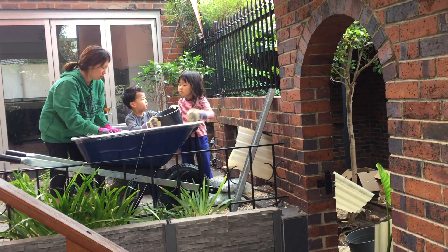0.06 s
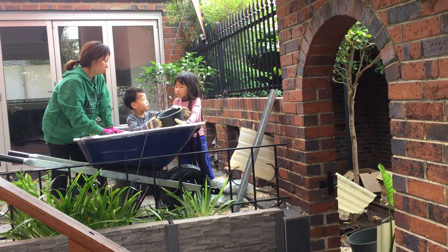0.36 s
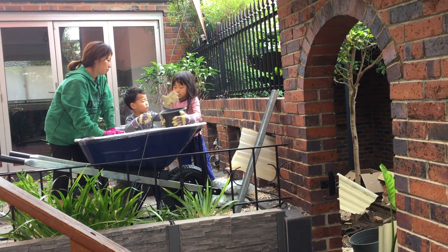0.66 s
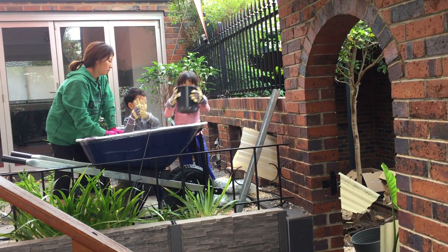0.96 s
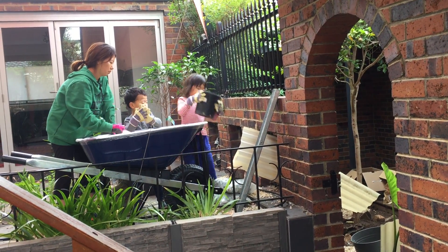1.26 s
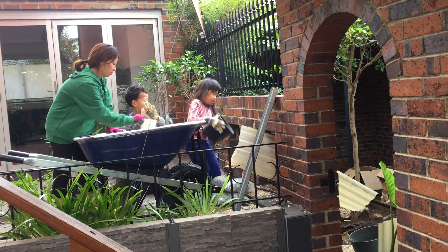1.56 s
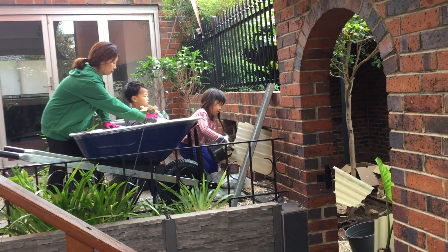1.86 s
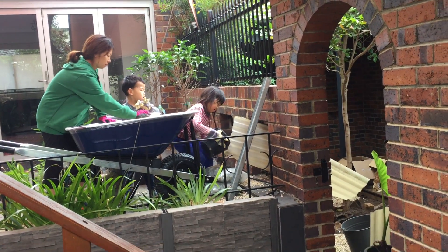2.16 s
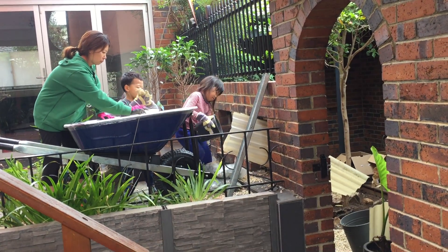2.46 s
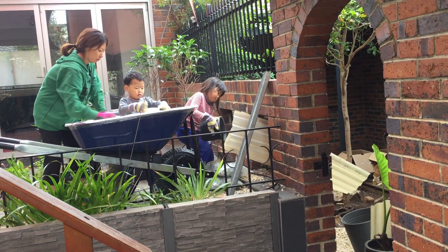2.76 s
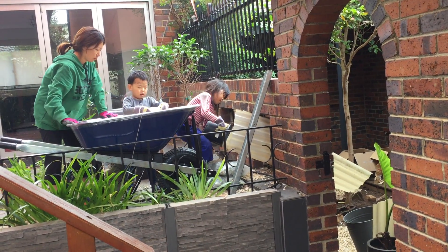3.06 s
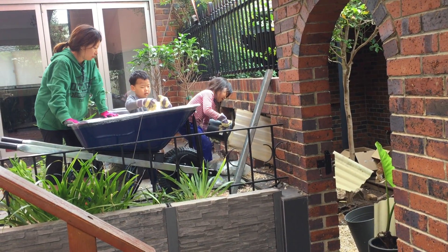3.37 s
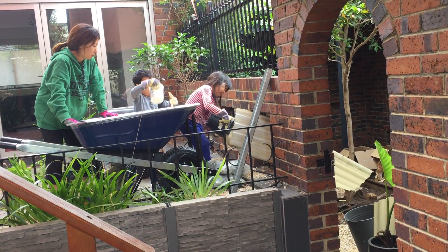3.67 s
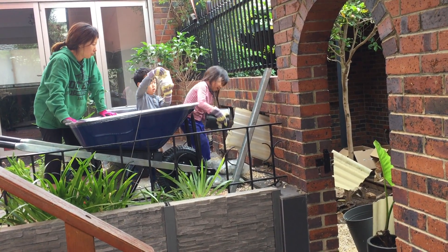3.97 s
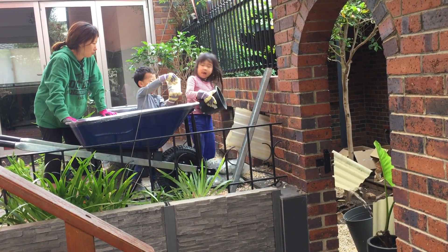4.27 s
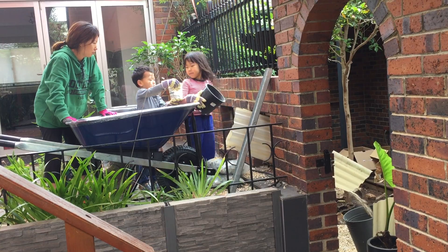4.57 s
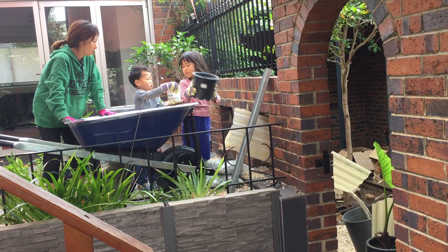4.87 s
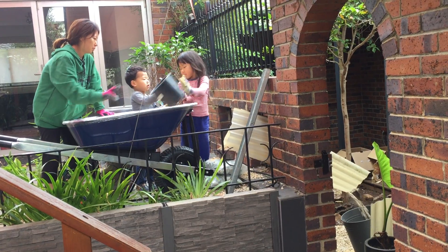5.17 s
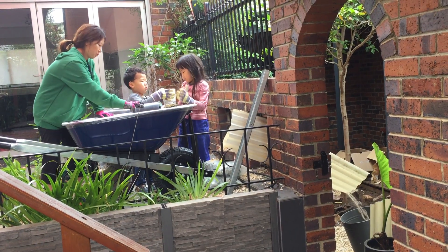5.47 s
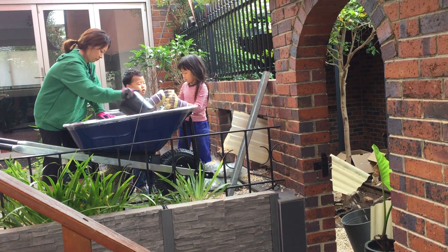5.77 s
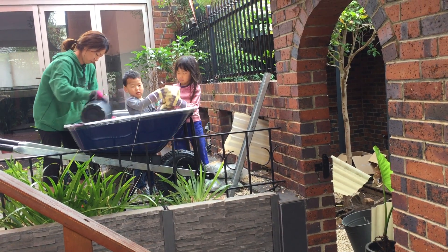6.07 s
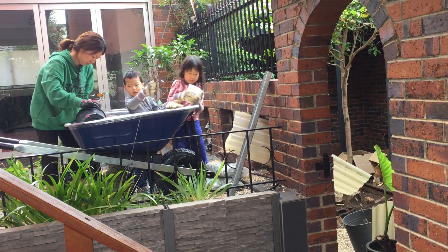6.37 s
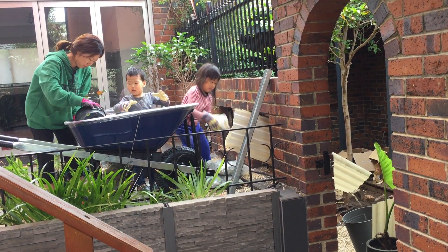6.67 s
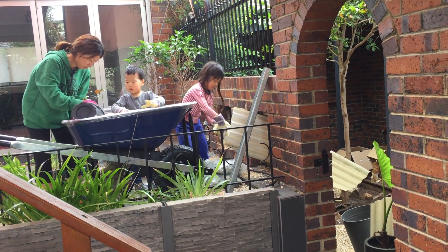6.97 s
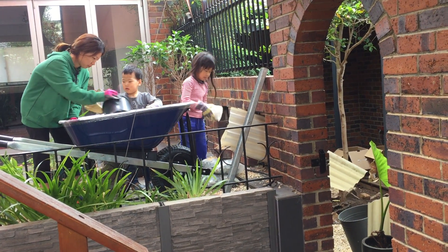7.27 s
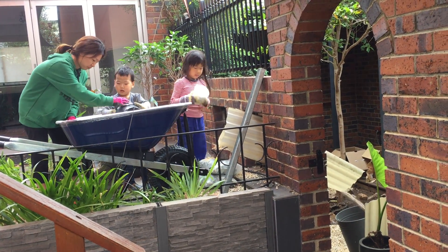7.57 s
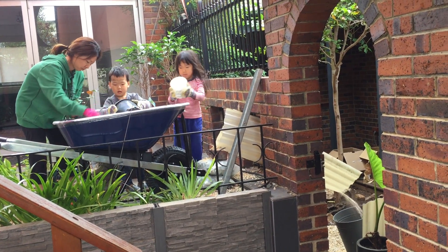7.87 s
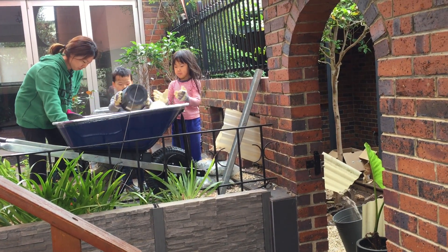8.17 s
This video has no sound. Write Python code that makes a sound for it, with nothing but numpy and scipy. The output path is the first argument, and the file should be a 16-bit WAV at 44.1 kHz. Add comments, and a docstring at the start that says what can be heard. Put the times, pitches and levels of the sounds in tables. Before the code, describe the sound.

Loose stones are handled close by in a brick-walled garden, with slight reflections and a faint outdoor hush. The first second holds light scrapes, small knocks and a few very faint bird whistles. From about 1.3 seconds stones crunch as they are scooped from a heap, and at 1.8 a short spill clatters onto a metal chute. Small clicks and more faint bird notes follow. After another scoop, a long, loud pour starts at 3.2 seconds: the metal rattles and booms while stones clink together, with several clumps and sharp knocks. It thins out, dropping slightly in pitch, until about 6.7. At 6.9 a heavy load lands at once with the loudest crash and rattles on. Around 7.8 the stones slide with a ringing scrape, a hiss of grit and one sharp knock, and the clatter is draining away at about 8.4 seconds.

```python
"""In a brick-walled garden, loose stones are scooped from a heap and poured down a metal chute.
A short spill, a long pour and a heavy load dumped at once each start, run and drain away. The impacts
excite the resonances of the chute: its wall rattles and its panels boom, both lower as the stream thins.
Stone clinks on stone, most where they crowd together, and friction makes the floor and wall ring.
The brickwork reflects it all, and a small bird whistles over a faint outdoor hush."""
import sys
import numpy as np
from scipy import signal
from scipy.fft import rfft, irfft
from scipy.io import wavfile
from scipy.ndimage import uniform_filter1d, map_coordinates

SR = 44100
rng = np.random.default_rng(int(sys.argv[2]) if len(sys.argv) > 2 else 0)


def transcribe(u):
    """Save the signal u as a 16-bit wav file named by the first command-line argument.

    u: samples, shape (n,) or (channels, n), limited to [-1, 1]; the rate is SR.
    q: integer samples, one column per channel.
    """
    v = np.clip(np.atleast_2d(u).T, -1, 1)
    q = np.round(v * 32767).astype(np.int16)
    wavfile.write(sys.argv[1], SR, q)


N = 367353
TIME = np.arange(N) / SR
BINS = np.fft.rfftfreq(8192, 1 / SR)  # frequency grid of the filters, f/Hz
BAND_LIMIT_HZ = 17350

# loads running down the chute: (start t/s, clatter level/dB, rise/s, full flow/s, draining/s,
# taper exponent, boom re clatter/dB, crowded time/s, peak clink re clatter/dB)
POURS = [(1.828, -33, 0.0098, 0.098, 0.52, 3.6, -5, .25, -10),
         (2.945, -44.5, 0.11, 0.16, 0.063, 1.04, -1, 0.24, 0),
         (3.172, -24, 0.0668, 0.94, 2.874, 0.65, -9.5, 2.56, -2),
         (6.875, -22.5, 0.039, 0.45, 1.91, 0.82, -10.5, 1.61, -3)]
# clumps of stones hitting the chute: (t/s, level/dB, rise/s, hold/s, T60/s)
DUMPS = [(1.829, -25, 0.0047, 0.0095, 0.11), (3.18, -26.5, 0.016, 0.055, 0.23),
         (3.602, -27, 0.013, 0.13, 0.68), (4.198, -26.5, 0.023, 0.072, 0.31),
         (5.331, -32, 0.0088, 0.22, 0.74), (6.191, -33.5, 0.0064, 0.083, 0.32),
         (6.626, -40, .02, 0.11, 0.51), (6.855, -14.5, 0.0084, 0.022, 0.58),
         (6.865, -14, 0.017, 0.042, 0.087)]
# heavy stones tumbling over the panels: (peak t/s, level/dB)
TUMBLES = [(3.21, -31), (3.38, -28.5), (4.13, -31), (4.72, -37), (5.69, -32), (5.95, -34), (6.14, -31.5),
           (7.3, -29), (7.59, -31), (8.3, -30.5)]
# brief chokes of the stream: (centre t/s, dip/dB, half-length/s)
STALLS = [(5.71, -1.5, 0.065), (6.144, -2, .045), (6.442, -2.5, 0.0257)]
# broad spectrum of the struck chute wall: (f/Hz, level/dB)
WALL_SPECTRUM = [(150, -31.5), (400, -18.5), (560, -2), (1000, -1), (1600, -1.5), (2250, -0.5),
                 (2500, -5.5), (3500, -5), (5000, -13), (9000, -19.5), (17000, -32)]
# resonances on that spectrum under a full stream: (f/Hz, bandwidth/Hz, lift/dB)
WALL_MODES = [(724, 28, 3), (883, 55, 4), (1002, 104, 3), (1440, 75, 4), (2000, 91, 4), (2149, 163, 6)]
# low modes of the chute panels under a full stream: (f/Hz, bandwidth/Hz, level/dB)
PANEL_MODES = [(133.2, 39, -12.5), (198, 93, -10), (257.3, 45, -2.5), (304.2, 40, 1.5), (345.6, 38.5, 4),
               (376.4, 29.8, 7), (407.5, 33.5, 5.5), (475, 50, -2)]
# spectrum of stone clinking on stone: (f/Hz, level/dB)
CLINK_SPECTRUM = [(800, -30), (2400, -5.5), (3000, -0.5), (4000, -2.5), (6000, -7.5), (9300, -10.5),
                  (12000, -17.5), (17000, -22.5)]
# modes of the chute floor under sliding stones: (f/Hz, bandwidth/Hz, level/dB)
FLOOR_MODES = [(2237, 310, -4), (2640, 490, -1.5), (3156, 490, 2), (3732, 400, -7), (4536, 1680, -1.5)]
# sprays of fine grit: (peak t/s, level/dB, half-length/s)
SPRAYS = [(1.922, -37, .035), (5.35, -37, 0.58), (6.638, -43, 0.14), (6.838, -40.5, 0.022),
          (7.103, -35, .17), (7.768, -28, 0.22)]
# spectrum of grit on metal: (f/Hz, level/dB)
SPRAY_SPECTRUM = [(2000, -28), (5000, 5), (9000, 0), (12000, -1), (17000, -5.5)]
# stones rubbing along the wall: (peak t/s, level/dB, half-length/s, f/Hz)
RUBS = [(5.97, -41.5, 0.28, 860), (7.724, -25, 0.029, 2315)]
# strokes through the heap and stones landing on it: (peak t/s, level/dB, rise/s, T60/s)
SCOOPS = [(1.343, -46.5, 0.008, 1.4), (1.499, -30, 0.07, 1.03), (1.757, -36.5, 0.019, 0.66),
          (1.88, -32, 0.045, 0.99), (2.035, -31.5, 0.035, 0.31), (2.79, -45, 0.014, 0.29),
          (3.04, -35.5, 0.054, 6.3), (3.17, -31.5, 0.035, 0.27)]
# light scrapes on the heap: (peak t/s, level/dB, rise/s, T60/s, grit offset/dB)
SCRAPES = [(.265, -42, 0.014, 0.21, 2), (.705, -53, 0.068, 0.35, -9)]
# spectrum of the crunching heap: (f/Hz, level/dB)
HEAP_SPECTRUM = [(100, -35), (440, -7.5), (560, -1.5), (700, -3), (1400, 2), (3500, -2), (5000, -9.5),
                 (9000, -16.5), (17000, -25)]
# sharp chips of stone on stone: (t/s, level/dB, T60/s)
CHIPS = [(1.799, -38, .049), (1.835, -35, 0.29), (1.905, -36, 0.22), (2.205, -44.5, 0.12),
         (2.779, -47, 0.25), (3.831, -21.5, 0.29), (6.204, -35, 0.11), (7.515, -21, 0.087)]
# spectrum of a chip: (f/Hz, level/dB)
CHIP_SPECTRUM = [(1000, -16), (4000, -11), (6500, -8.5), (9500, -10.5), (17000, -20)]
# bright snaps of small hard stones meeting: (t/s, level/dB, T60/s, ring f/Hz)
SNAPS = [(2.378, -29.5, 0.015, 12650), (2.455, -35.5, 0.045, 11050), (3.620, -28, .06, 12500),
         (4.469, -25, 0.14, 12500)]
# spectrum of a snap: (f/Hz, level/dB)
SNAP_SPECTRUM = [(2000, -49), (4200, -7), (5500, -18), (8000, -20), (9500, -6), (11000, -4), (12700, -2),
                 (14500, -5), (17000, -6)]
# modes left ringing by a snap: (ratio to its ring frequency, bandwidth/Hz, level/dB)
GLINT_MODES = [(.77, 1900, 1), (1, 1700, 1), (1.37, 350, -9)]
# knocks of single stones, and one low bump of the bucket near 0.27 s: (t/s, level/dB, f/Hz, T60/s)
KNOCKS = [(.265, -39, 2800, .12), (0.273, -50, 365, .15), (.366, -39, 950, 0.05),
          (0.366, -41.5, 2720, .045), (0.655, -46, 1250, .06), (.657, -53, 293, .12), (.708, -50, 990, .08),
          (.745, -46.5, 2240, 0.085), (.770, -41, 2060, 0.1), (1.442, -38, 604, 0.22),
          (1.507, -23.5, 1360, 0.059), (1.661, -34, 1150, .06), (1.702, -35, 1320, .07),
          (1.905, -24, 1387, 0.077), (2.201, -38, 1290, .04), (2.249, -43.5, 2150, 0.078),
          (2.270, -41, 2080, 0.062), (2.685, -38, 1970, 0.03), (2.749, -46, 1980, .027),
          (3.932, -18, 1340, 0.058), (4.248, -25, 2950, .07), (5.359, -19.5, 1432, 0.12),
          (5.442, -23, 1920, 0.07), (5.792, -24, 878, 0.083), (6.473, -26.5, 2050, 0.057),
          (7.881, -14, 3194, 0.057)]
# modes of a knocked stone: (ratio to the knock's frequency, level/dB)
STONE_MODES = [(0.708, -2.5), (1.002, 3), (1.16, -5.5), (1.6, -11)]
# thuds of weight coming down: (t/s, level/dB, T60/s, chute ring re thump/dB)
THUDS = [(.235, -39, 0.066, -12), (1.846, -35.5, 0.69, 5), (3.238, -40, 0.58, 0), (4.282, -36.5, 0.3, 4),
         (6.215, -40, 0.34, 1), (6.891, -38.5, 0.49, 11.5)]
# modes of the whole chute on its supports: (f/Hz, level/dB)
BODY_MODES = [(75, -13), (135, -6), (273, -9), (355, -0.5), (538, -4), (727, -7.5)]
# bird notes: (t/s, length/s, start f/Hz, end f/Hz, level/dB)
BIRD_NOTES = [(0.378, 0.026, 3990, 3780, -55), (0.468, 0.052, 4240, 4150, -65),
              (0.53, .08, 3550, 3500, -63), (0.816, 0.056, 4420, 4300, -65), (.889, 0.042, 3550, 3480, -55),
              (2.21, 0.027, 3460, 3440, -49), (2.36, 0.021, 3590, 3550, -52.5),
              (2.39, 0.04, 3520, 3440, -55)]
# reverberation of the garden for a near source: (f/Hz, T60/s)
GARDEN_DECAY = [(100, 1), (1000, 0.38), (4000, 0.091), (16000, 0.64)]
# spectrum of the outdoor hush: (f/Hz, level/dB)
AIR_SPECTRUM = [(20, -25), (66, -2.5), (210, -8), (450, -15), (1140, -15.5), (2200, -18), (5000, -23.5),
                (17000, -35.5)]
# dips of the microphone port: (f/Hz, bandwidth/Hz, gain/dB)
PORT_DIPS = [(4930, 320, -5), (7750, 1560, -2.5), (10400, 590, -6.5)]


def chute(clatter_db=0.62, clink_db=-0.26, dump_boom_db=-8.5, dump_clink_db=-6, full_db=-24):
    """Impact excitation: the stream drums on the metal, and a stronger flow lands more stones a second."""
    choke = amp(sum(db * bell(s, half) for s, db, half in STALLS))
    clatter, boom, clink = choke * power_sum(pour(*row) for row in POURS)
    tumbling = power_sum(amp(db) * swell(s, rise=0.049, t60=0.44) for s, db in TUMBLES)
    dumped = power_sum(amp(db) * burst(s, rise, hold, t60) for s, db, rise, hold, t60 in DUMPS)
    clatter = np.hypot(clatter, dumped)
    boom = power_sum([boom, tumbling, amp(dump_boom_db) * dumped])
    clink = np.hypot(clink, amp(dump_clink_db) * dumped)
    fullness = clatter / amp(full_db)
    rate = 6500 * (fullness + .9)  # even a trickle holds many stones
    blows = impacts(rate, spread_db=1.9, cycles=14.3, tick=1)
    wall = unit_rms(colour(blows, curve(WALL_SPECTRUM) + peaks(WALL_MODES)))
    heavy_blows = impacts(.1 * rate, spread_db=3.5, cycles=2.5, tick=0.97)
    panels = resonate(heavy_blows, PANEL_MODES)  # only heavy stones shake the panels
    contacts = shaped(impacts(2 * rate, spread_db=2, cycles=14, tick=.8), CLINK_SPECTRUM)
    return (amp(clatter_db) * clatter * sag(wall, fullness, share=.07)
            + boom * sag(panels, fullness, share=.11)
            + amp(clink_db) * clink * contacts)


def pour(s, db, rise, full, draining, taper, boom_db, crowded, clink_db):
    """Granular flow starts, holds and drains, setting the gains of clatter, boom and clink."""
    onset = ramp(TIME - s, rise)
    flow = (1 - ramp(TIME - s - full, draining)) ** taper
    boom = amp(boom_db) * flow ** 0.73  # the panels keep booming as the flow thins
    crowding = np.sin(np.pi * ramp(TIME - s, crowded))
    clink = np.hypot(amp(-12.5) * flow, amp(clink_db) * crowding)  # a thin stream still clinks
    return amp(db) * onset * np.array([flow, boom, clink])


def impacts(per_s, spread_db, cycles, tick):
    """Shot noise: each random blow is an impulse plus a damped sinusoid at the stone's own frequency."""
    chance = np.clip(per_s * np.ones(N) / SR, 1e-4, .25)  # of a blow in each sample
    luck, weight, pitch, polarity = rng.random((4, N))
    hits = np.flatnonzero(luck < chance)
    size_db = spread_db * np.minimum(-np.log(weight[hits]), 4)  # a few stones are large
    size = amp(size_db) / np.sqrt(chance[hits])  # mean power is independent of the rate
    hz = np.geomspace(500, 17000, 600)[:, None]
    turns = hz * np.arange(900) / SR
    # high rings are brief, so they start stronger
    rings = np.sin(2 * np.pi * turns) * np.exp(-turns / cycles) * hz
    ringing, ticks = np.zeros(N + rings.shape[1]), np.zeros(N)
    ticks[hits] = size * np.where(polarity[hits] < .5, -1, 1)
    for i, k in zip(hits, (pitch[hits] * len(hz)).astype(int)):
        ringing[i:i + rings.shape[1]] += ticks[i] * rings[k]
    return unit_rms(unit_rms(ringing[:N]) + tick * unit_rms(ticks))


def sag(x, fullness, share):
    """Time dilation lowers every resonance, by up to this share, as the stream thins."""
    speed = 1 - share * (1 - np.minimum(fullness, 1))
    return map_coordinates(x, [np.cumsum(speed)], order=3, mode="mirror")


def uneven_flow(depth_db=.5, clump_s=0.055):
    """Random amplitude modulation: the stream never runs quite evenly."""
    lumps = rng.standard_normal(2000)
    return amp(depth_db * np.interp(TIME / clump_s, np.arange(len(lumps)), lumps))


def slide(peak_s=7.79, level_db=-21.5, half_s=0.24):
    """Stick-slip friction: the last load slides as one sheet and drives the modes of the chute floor."""
    sheet = bell(peak_s, half_s)
    slips = impacts(4500 * np.sqrt(sheet), spread_db=2, cycles=9.5, tick=0.99)
    return amp(level_db) * sheet * resonate(slips, FLOOR_MODES)


def sprays():
    """Dense, light impacts of grit skittering over the metal merge into a thin sizzle."""
    sizzle = shaped(impacts(5000, spread_db=4.5, cycles=20, tick=1), SPRAY_SPECTRUM)
    return sizzle * power_sum(amp(db) * bell(s, half) for s, db, half in SPRAYS)


def rubs(width_hz=90):
    """Forced vibration: the friction noise of a passing stone drives a narrow resonance of the wall."""
    friction = rng.standard_normal(N)
    return sum(amp(db) * bell(s, half) * band(friction, hz, width_hz) for s, db, half, hz in RUBS)


def heap(scrape_db=-1, grit_db=-2):
    """Contact noise: stones grind on each other in the heap, away from the ringing chute."""
    crunch = shaped(impacts(3400, spread_db=2.5, cycles=6, tick=.9), HEAP_SPECTRUM)
    grains = impacts(3000, spread_db=4, cycles=24, tick=1)
    treble_loss_db = 6 * np.log2(1 + BINS / 4000)  # light scrapes lose their treble on the way
    grit = unit_rms(colour(grains, curve(CLINK_SPECTRUM) - treble_loss_db))
    midrange = signal.butter(4, [550, 3000], "band", fs=SR, output="sos")
    dull_crunch = unit_rms(signal.sosfilt(midrange, crunch))
    scooping = power_sum(amp(db) * swell(s, rise, t60) for s, db, rise, t60 in SCOOPS)
    scraping, gritty = power_sum(amp([[db], [db + offset_db]]) * swell(s, rise, t60)
                                 for s, db, rise, t60, offset_db in SCRAPES)
    return scooping * crunch + amp(scrape_db) * scraping * dull_crunch + amp(grit_db) * gritty * grit


def settling():
    """Brief contacts have broad spectra: small stones settle with bright chips and snaps."""
    chatter, out = rng.standard_normal(N), np.zeros(N)
    for hits, spectrum in (CHIPS, CHIP_SPECTRUM), (SNAPS, SNAP_SPECTRUM):
        envelope = sum(amp(db) * decay(s, t60) for s, db, t60, *_ in hits)
        out += envelope * shaped(chatter, spectrum)
    return out + glints(chatter)


def glints(chatter, ring_db=-18, t60=0.26):
    """Lightly damped modes outlast each snap as a faint, glassy ring at the stone's own pitch."""
    out = np.zeros(N)
    for s, db, _, hz in SNAPS:
        ring = sum(amp(mode_db) * band(chatter, min(ratio * hz, BAND_LIMIT_HZ), width)
                   for ratio, width, mode_db in GLINT_MODES)
        out += amp(ring_db + db) * decay(s, t60) * unit_rms(ring)
    return out


def knocks(relative_width=0.8, rasp_db=-4, ring_db=-5):
    """Free vibration: a blow rings a stone's inharmonic modes, with a rasp of crushed grit."""
    out, t = np.zeros(N), TIME[:SR // 2]
    for s, db, hz, t60 in KNOCKS:
        ring = partials(STONE_MODES, hz * t)
        rasp = band(rng.standard_normal(len(t)), hz, relative_width * hz)
        envelope = amp(db - 60 * t / t60) * ramp(t, 1 / hz)
        add(out, s, envelope * (amp(ring_db) * ring + amp(rasp_db) * rasp))
    return out


def thuds(thump_hz=136, width_hz=115, rise_s=0.02):
    """Sudden loading: weight coming down thumps and excites the modes of the whole chute."""
    out, t = np.zeros(N), TIME[:SR]
    for s, db, t60, ring_db in THUDS:
        thump = band(rng.standard_normal(2 * SR), thump_hz, width_hz)[SR:]
        ring = partials(BODY_MODES, t)
        envelope = amp(db - 60 * t / t60) * ramp(t, rise_s)
        add(out, s, envelope * (thump + amp(ring_db) * ring))
    return out


def bird(waver=0.008):
    """Frequency modulation: each whistle is a pure tone that wavers and glides slightly down."""
    out = np.zeros(N)
    wobble = 1 + waver * unit_rms(uniform_filter1d(rng.standard_normal(N), size=200))
    for s, length, start_hz, end_hz, db in BIRD_NOTES:
        note = slice(round(s * SR), round((s + length) * SR))
        progress = ramp(TIME[note] - s, length)
        hz = wobble[note] * (start_hz + progress * (end_hz - start_hz))
        envelope = amp(db) * np.sqrt(2 * abs(np.sin(np.pi * progress)))
        out[note] += envelope * np.sin(2 * np.pi * np.cumsum(hz) / SR)
    return out


def garden(x, wet_db, linger=1, crossfade_s=0.703, count=3, echoes_per_s=2500):
    """Reverberation: reflections off brick and paving decay at a rate that depends on frequency."""
    shape = (count, SR // 2)
    taps = rng.standard_normal(shape) * (rng.random(shape) < echoes_per_s / SR)
    taps *= TIME[:SR // 2] > .004  # no reflection arrives in the first 4 ms
    hz, t, spectra = signal.stft(taps, SR, nperseg=256)
    t60 = linger * curve(GARDEN_DECAY, hz)[:, None]
    tails = signal.istft(spectra * amp(-60 * t / t60), SR, nperseg=256)[1]
    # three echo tails crossfade in turn, keeping the reverberation smooth and free of steady tones
    shares = [np.sqrt(2 / count) * np.sin(np.pi * (TIME / crossfade_s + k / count))
              for k in range(count)]
    echo = sum(signal.oaconvolve(x * share, tail / np.linalg.norm(tail))[:N]
               for share, tail in zip(shares, tails))
    return (x + amp(wet_db) * echo) / np.hypot(1, amp(wet_db))


def air(level_db=-63.5):
    """Stationary noise, strongest in the bass, makes the faint outdoor hush."""
    spectrum = rfft(rng.standard_normal(N)) * amp(curve(AIR_SPECTRUM, np.fft.rfftfreq(N, 1 / SR)))
    return amp(level_db) * unit_rms(irfft(spectrum, N))


def resonate(x, modes, lag_samples=97):
    """Modal superposition: the drive reaches each mode a little later than the last."""
    return unit_rms(sum(amp(db) * band(np.roll(x, lag_samples * k), hz, width)
                        for k, (hz, width, db) in enumerate(modes)))


def partials(modes, t):
    """Sinusoids add in random phase; t is in seconds for modes in Hz, in cycles for ratios."""
    return unit_rms(sum(amp(db) * np.sin(2 * np.pi * (f * t + rng.random())) for f, db in modes))


def band(x, hz, width):
    """Two equal resonators in cascade give one steep peak."""
    b, a = signal.iirpeak(hz, hz / width, SR)
    return unit_rms(signal.lfilter(b, a, signal.lfilter(b, a, x)))


def colour(x, db):
    """A minimum-phase filter is causal: it rings after a hit, never before."""
    log_gain = np.log(amp(np.r_[db, db[-2:0:-1]]))
    taps = irfft(np.exp(np.conj(signal.hilbert(log_gain)))[:len(db)])
    return signal.oaconvolve(x, taps / np.linalg.norm(taps))[:N]


def shaped(x, spectrum):
    """Source and filter: x takes on a tabulated spectrum, at unit power."""
    return unit_rms(colour(x, curve(spectrum)))


def curve(points, hz=BINS):
    """Interpolation on a logarithmic frequency axis."""
    f, value = np.transpose(points)
    return np.interp(np.log(hz + 1), np.log(f), value)


def peaks(rows):
    """Resonance-shaped peaks or dips, summed in dB."""
    return sum(db / (1 + (2 * (BINS - hz) / width) ** 2) for hz, width, db in rows)


def ramp(t, length):
    """Linear rise from 0 to 1 over the given length."""
    return np.clip(t / length, 0, 1)


def decay(s, t60):
    """Exponential damping from time s: 60 dB in t60."""
    out = np.zeros(N)
    during = slice(round(s * SR), round((s + 2 * t60) * SR))
    out[during] = amp(-60 * (TIME[during] - s) / t60)
    return out


def burst(s, rise, hold, t60):
    """An envelope rises from s, holds until s + hold, then decays."""
    return ramp(TIME - s, rise) * np.where(TIME < s + hold, 1, decay(s + hold, t60))


def swell(s, rise, t60):
    """A stroke gathers speed up to s, then decays."""
    approach = np.exp(-np.minimum(abs((TIME - s) / rise), 20) ** 1.27)
    return np.where(TIME < s, approach, decay(s, t60))


def bell(s, half):
    """A smooth envelope peaks at s and is down to 1/e a half-length to either side."""
    return np.exp(-np.minimum(((TIME - s) / half) ** 2, 40))


def power_sum(gains):
    """Incoherent sounds add in power."""
    return np.sqrt(sum(gain ** 2 for gain in gains))


def add(mix, s, sound):
    """Superposes a sound on the mix at time s."""
    part = mix[round(s * SR):][:len(sound)]
    part += sound[:len(part)]


def amp(db):
    """Level in dB to amplitude ratio."""
    return 10 ** (np.asarray(db) / 20)


def unit_rms(x):
    """Normalisation to unit mean power."""
    return x / np.sqrt(np.mean(x ** 2) + 1e-20)


def scene():
    """Direct and reflected sound: the near stones are mostly direct, while the far bird lingers."""
    stones = chute() + slide() + sprays() + rubs() + heap() + settling() + knocks() + thuds()
    background = garden(bird(), wet_db=2.5, linger=6) + air()
    return (garden(stones * uneven_flow(), wet_db=-8) + background)[None]


def record(dry, low_cut_hz=48, ceiling=.85):
    """Transduction: microphone colour and bass cut, soft saturation of peaks, then the band limit."""
    heard = unit_rms(colour(dry[0], peaks(PORT_DIPS))) * dry.std()
    heard = signal.sosfilt(signal.butter(2, low_cut_hz, "high", fs=SR, output="sos"), heard)
    heard = heard / (1 + (heard / ceiling) ** 6) ** (1 / 6)
    low_pass = signal.firwin(511, BAND_LIMIT_HZ, window=("kaiser", 9), fs=SR)
    return signal.oaconvolve(heard, low_pass, "same")[None]


dry = scene()
out = record(dry)
transcribe(out)
```